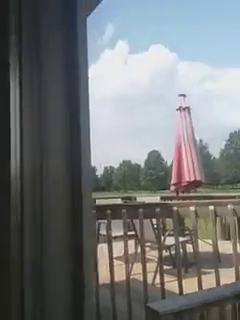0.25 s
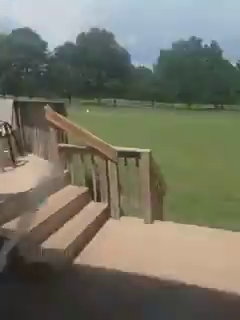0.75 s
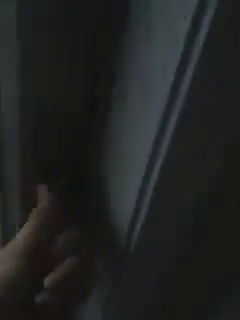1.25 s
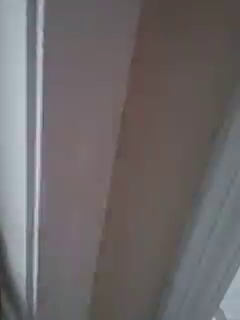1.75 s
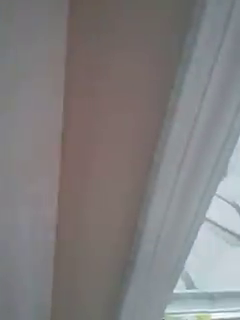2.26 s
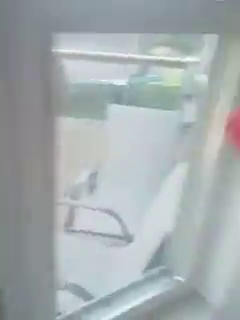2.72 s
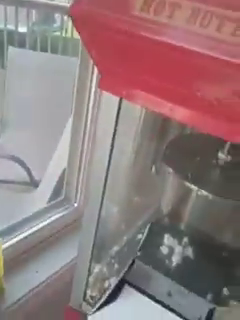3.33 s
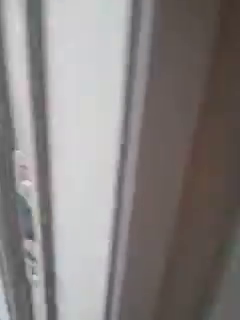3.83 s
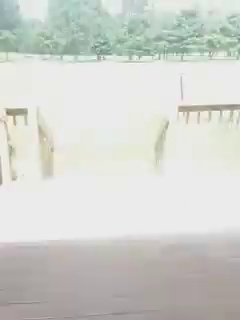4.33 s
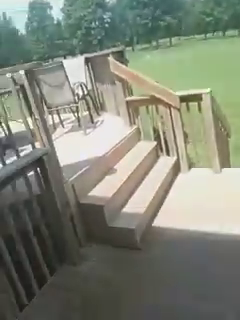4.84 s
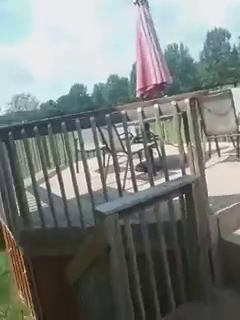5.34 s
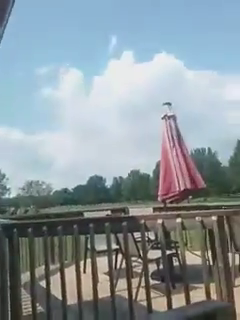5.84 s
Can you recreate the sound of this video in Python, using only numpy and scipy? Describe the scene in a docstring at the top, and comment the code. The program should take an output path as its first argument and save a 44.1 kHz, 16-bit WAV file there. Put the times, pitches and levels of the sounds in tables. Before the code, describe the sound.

Close by in a quiet humming house, small handle clicks and finger rubs lead to a sharp double knock on a sliding glass door. The pane booms and the frame chatters. After a pause the seal pops free and the door rolls roughly along a gritty track, ending in a brief squeak and dry scrape. Low, soft footstep thumps follow, felt through the handheld microphone.

```python
"""House hum and a thin whine, then a handle clicks: a sliding glass patio door, close by inside a house.
Clicks are coloured noise bursts; the door knocks, its pane rings in decaying modes and its frame chatters.
It rolls on a gritty track (dense random grains), then stops with a stick-slip squeak and a dry scrape.
Low thumps, short pitched pushes, are hand bumps and steps felt through the hand holding the microphone.
Soft rubs, far trees and a faint late tone from the yard are shaped noise and a sine."""
import sys
import numpy as np
from scipy import signal
from scipy.fft import rfft, irfft, next_fast_len
from scipy.io import wavfile
from scipy.ndimage import uniform_filter1d

SR = 44100
rng = np.random.default_rng(int(sys.argv[2]) if len(sys.argv) > 2 else 0)


def dump(signal):
    """Clip the signal to [-1, 1] and save it as 16-bit WAV at the path in sys.argv[1]."""
    limited = np.clip(np.atleast_2d(signal).T, -1, 1)
    pcm = np.round(limited * 32767).astype(np.int16)
    wavfile.write(sys.argv[1], SR, pcm)


N = 267907
TIME = np.arange(N) / SR

# House hum and air colour: (frequency [Hz], relative level [dB])
HOUSE_COLOUR = [(15, -51), (25, -20), (37, -13.5), (120, -1), (316, -5), (352, -24.5), (382, -3),
                (449, -19), (513, -14.5), (881, -19.5), (1060, -18), (2390, -21), (5520, -34), (14600, -32),
                (15800, -26)]
# Far-tree colour: (frequency [Hz], relative level [dB])
TREE_COLOUR = [(1000, -17), (2800, -12), (4600, 0), (6000, -8), (8000, -14.5), (15000, -33)]
# Gusts in the far trees: (crest time [s], level [dB], half length [s])
GUSTS = [(1.03, -70, .28), (4.75, -67.5, 0.27), (5.497, -69, 0.89)]
# Handle, latch and grit clicks: (time [s], nominal peak [dB], ring pitch [Hz],
#   top treble before offset and slope [dB], ring strength [dB], left minus right [dB])
CLICKS = [(0.504, -48.5, 2630, -25, 10, -20), (0.56, -34, 2210, -38, 3, -26),
          (1.147, -44.5, 4630, -29, 9, 5), (1.307, -44.5, 2020, -35, -7, 7), (1.34, -47, 2840, -32, 1, -9),
          (1.503, -33.5, 1750, -50, 3, 1), (1.508, -30.5, 4600, -52, 6.5, 25),
          (1.518, -35.5, 1700, -38, 4, -8), (1.559, -41.5, 1880, -49, 4, -1),
          (1.602, -41, 3190, -23, 8, -4), (1.608, -28, 2200, -21, -1.5, 0),
          (1.659, -38.5, 4760, -26, 9.5, 4.5), (1.688, -35.5, 2770, -48, 3, 3),
          (1.73, -33, 2560, -23, 2, 1.5), (1.775, -33, 2520, -21, 6, -7.5), (1.788, -37, 2400, -47, 2, 9),
          (1.915, -33.5, 2900, -29, 6, 0.5), (1.951, -9, 2820, -26, 5, 3.5), (1.968, -26, 1850, -42, 22, 9),
          (1.994, -19, 2090, -46, 4, -1), (2.093, -16.5, 1940, -61, 10, -3), (2.115, -32, 1930, -17, 8, 0),
          (2.132, -32.5, 1900, -35, 13, 3), (2.2, -30.5, 1960, -37, 9.5, 3), (2.371, -46, 2900, -18, -1, 3),
          (3.069, -30, 1710, -17, 3.5, 6), (3.36, -40, 1500, -26, 11, -3), (3.486, -21.5, 2250, -21, 14, 6),
          (3.5, -22.5, 1300, -23, 11, 2), (3.512, -28, 1340, -16, 16, -1),
          (3.568, -24.5, 5060, -25, 24, -1), (3.578, -25.5, 2100, -15, 2, 6),
          (4.135, -30, 1200, -41, -2, 4), (4.232, -30, 2130, -6.5, 5, -5),
          (4.942, -35.5, 2880, -19, 3, -10)]
# Click colour: (frequency [Hz], relative level [dB])
CLICK_COLOUR = [(100, -2.5), (500, -2), (1150, 1), (1700, 5), (2900, 5.5), (3700, 1.5), (5300, -4),
                (6300, -9.5), (7800, -9.5), (15500, -19)]
# Room decay: (frequency [Hz], t60 [s])
ROOM_T60 = [(100, .6), (1000, 0.86), (4000, 0.057), (12000, .2)]
# Rubs of fingers, sleeve and seal: (crest time [s], level [dB], half length [s], left minus right [dB])
BRUSHES = [(0.571, -56, 0.01, -21), (0.796, -64.5, 0.22, -3.5), (1.227, -59, 0.017, 2),
           (1.364, -66, 0.046, 1), (1.544, -56.5, 0.027, 3), (1.712, -65, 0.31, 4),
           (3.117, -58.5, 0.069, -1), (3.458, -50.5, 0.013, -2), (4.886, -56, 0.018, -6),
           (4.989, -54, 0.031, -8), (5.487, -62.5, 0.026, -2)]
# Rub colour: (frequency [Hz], relative level [dB])
RUB_COLOUR = [(300, -19.0), (1000, -3.5), (2000, -2), (4200, -4.5), (6500, -16.0), (15000, -28.5)]
# Creak colour: (frequency [Hz], relative level [dB])
CREAK_COLOUR = [(60, -4), (200, 6), (450, -9.0), (800, -6.5), (1200, -14.0), (2500, -31), (8000, -41)]
# Blows on the door panel: (time [s], gain on the summed modes [dB])
BLOWS = [(1.925, -56), (1.958, -21.5), (2.002, -24), (2.155, -42), (3.08, -55), (3.17, -63), (3.497, -42),
         (3.905, -39), (4.552, -52)]
# Pane and frame modes: (frequency [Hz], relative level [dB], t60 [s])
PANE_MODES = [(52, -11, .6), (80, -10, .6), (115, -14, .7), (173, -4, .6), (188, -9, .45), (235, -14, .55),
              (257, -11, .45), (297, -.5, .38), (315, -1.5, .38), (362, -11, .42), (402, -14, .42),
              (468, -16, .45), (618, -25, .5), (900, -21, .4)]
# Chatter buzz colour: (frequency [Hz], relative level [dB])
BUZZ_COLOUR = [(290, -37), (500, -13), (750, -4), (1100, 0.5), (1500, -6), (2100, -2.5), (3000, -7.5),
               (3600, -10), (4700, -6), (6000, -14.5), (7200, -24), (15500, -39.5)]
# Panel rumble colour: (frequency [Hz], relative level [dB])
RUMBLE_COLOUR = [(20, -13), (45, -14), (80, -2), (170, 1), (330, -1.5), (420, 0.5), (520, -7.5),
                 (650, -11.5), (1200, -51)]
# Roller grit colour: (frequency [Hz], relative level [dB])
ROLLER_COLOUR = [(260, -29.5), (450, -13.5), (510, -2), (555, -27), (600, -6), (680, -7.5), (800, -1.5),
                 (1120, -5.5), (1480, -10), (2000, -9), (2600, -11), (3340, -21), (4430, -30), (6000, -44),
                 (8000, -65)]
# Brush seal colour: (frequency [Hz], relative level [dB])
SEAL_COLOUR = [(1500, -18), (3200, -6), (4700, -3), (5800, -9.5), (7500, -17.5), (10000, -24),
               (15500, -25.5)]
# Hollow frame decay under the rollers, then under the squeak: (frequency [Hz], t60 [s])
ROLLING_FRAME_T60 = [(500, 0.22), (5000, 0.073)]
SQUEAK_FRAME_T60 = [(500, 0.071), (5000, 0.025)]
# Door speed: (time [s], share of top speed [0-1])
DOOR_SPEED = [(3.47, 0), (3.52, 0.58), (3.7, 0.75), (3.85, 1), (4.13, 0.96), (4.33, .48), (4.49, 0.15),
              (4.54, 0.17)]
# Lumps and smooth spots in the track: (time [s], extra panel shake [dB], extra roller pressure [dB])
LUMPS = [(3.72, -7.5, -1), (3.83, 3.5, 4), (3.875, -5.5, 0.5), (3.915, 5.5, 1.5), (3.98, 0, 1),
         (4.04, -3, 0.5), (4.075, 3, 2.5), (4.145, 1, 5), (4.25, 4.5, 0)]
# Hand bumps on the microphone: (crest time [s], level [dB], pitch [Hz], half length [s], left minus right [dB])
BUMPS = [(3.548, -35.5, 68.5, 0.021, 4), (4.288, -29, 82, 0.042, 31), (4.431, -29.5, 102.4, 0.0107, 28)]
# Footsteps: (heel time [s], heel level [dB], heel pitch [Hz], toe delay [s], toe level [dB])
STEPS = [(4.862, -27, 120, 0.075, -39.5), (5.379, -31.5, 81, 0.099, -36), (5.874, -29, 74, .113, -49)]
# Floorboard knocks under the foot: (time [s], level [dB])
BOARDS = [(5.469, -34), (5.893, -32.5)]
# Scuff and floor colours: (frequency [Hz], relative level [dB])
SCUFF_COLOUR = [(25, -6), (70, 17), (180, 7), (400, -8.5), (800, -26), (2000, -44)]
FLOOR_COLOUR = [(40, -5), (80, 2), (160, 3), (320, -11), (500, -20.5), (1000, -43)]
# Roller groans as the door slows: (crest time [s], level [dB], half length [s], pitch [Hz])
GROANS = [(4.148, -41, 0.041, 504), (4.384, -47.5, 0.068, 515)]
# Groan partials: (multiple of pitch, relative level [dB])
GROAN_PARTIALS = [(1, 6), (2, -19)]
# Stick-slip squeak as the door stops: (time [s], pitch [Hz])
SQUEAK_PITCH = [(4.493, 899.5), (4.506, 880.4), (4.515, 817), (4.526, 863), (4.548, 830)]
# Squeak partials: (multiple of pitch, relative level [dB])
SQUEAK_PARTIALS = [(1, -1), (2, -4), (3, 4.5), (4, -16), (5, -13), (6, -12), (7, -22), (8, -22), (9, -28)]
# Dry jerks to a halt: (time [s], level [dB], rise [s], hold [s], t60 [s])
SCRAPES = [(4.494, -28.5, 0.0036, 0.013, 0.27), (4.554, -30, 0.0079, 0.0089, .11),
           (4.596, -43.5, 0.013, 0.021, 0.33)]
# Scrape colour: (frequency [Hz], relative level [dB])
SCRAPE_COLOUR = [(120, -55), (300, -17), (520, -1.5), (640, -7.5), (850, 5), (1150, 3.5), (1400, 2),
                 (1850, 3), (2700, 1), (3400, -2), (4100, -0.5), (5300, -8.5), (6500, -18), (15500, -33)]
# Likeness of the two ports: (frequency [Hz], left-right correlation [-1 to 1])
PORT_LIKENESS = [(40, 0.82), (150, 0.93), (330, 0.89), (550, 0.36), (900, -0.027), (2000, -0.052),
                 (8000, -0.044)]
# Port colour difference: (frequency [Hz], left minus right [dB])
PORT_TILT = [(100, -0.5), (400, -.7), (900, -2), (2200, -4), (4500, -0.6), (12000, 1)]

WHINE_HZ, EDGE_HZ = 15000, 15900
KNOCK_S, REST_S = 1.951, 2.362  # chatter starts; door rests
FREE_S, STOP_S = 3.478, 4.494  # door pulls free of its seal; squeak begins
LUMP_S = 0.015  # half the time a roller takes to cross a lump
# The microphone leans out of the doorway, away from the house hum; later a tone comes from the yard
OUTSIDE_S, YARD_TONE_S = 4.88, 5.79
HEEL_S, TOE_S, TOE_HZ = 0.012, 0.028, 89.7  # half lengths; toe pitch
BOARD_HZ, BOARD_S = 139, 0.0065  # pitch; half length


def amp(db):
    """Decibels to gain."""
    return 10 ** (np.asarray(db) / 20)


def unit(x):
    """Scales to an rms of 1."""
    return x / np.sqrt(np.mean(x ** 2) + 1e-20)


def read(points, hz):
    """Interpolates a spectrum table on a log-frequency axis."""
    f, value = np.transpose(points)
    return np.interp(np.log(hz + 1), np.log(f + 1), value)


def pan(db):
    """Left and right gains for a level difference, at constant total power."""
    return amp([[db / 2], [-db / 2]]) / np.sqrt(np.cosh(db * np.log(10) / 20))


def add(mix, s, sound):
    """Mixes a stereo sound in at time s."""
    part = mix[:, round(s * SR):][:, :sound.shape[1]]
    part += sound[:, :part.shape[1]]


def lowpass_or_highpass(x, kind, hz):
    """Third-order Butterworth filter."""
    return signal.sosfilt(signal.butter(3, hz, kind, fs=SR, output="sos"), x)


def colour(x, points, extra_db=lambda hz: 0, size=4096):
    """Causal minimum-phase filter with the given spectrum."""
    hz = abs(np.fft.fftfreq(size, 1 / SR))
    log_gain = np.log(amp(np.maximum(read(points, hz) + extra_db(hz), -100)))
    taps = np.fft.ifft(np.exp(signal.hilbert(log_gain).conj())).real
    return signal.fftconvolve(x, taps[None, :size // 2], axes=1)[:, :x.shape[1]]


def diffuse(x):
    """Long waves reach both microphone ports nearly alike, short ones do not."""
    size = next_fast_len(N)
    left, other = rfft(x, size)
    same = np.clip(read(PORT_LIKENESS, np.fft.rfftfreq(size, 1 / SR)), -1, 1)
    right = same * left + np.sqrt(1 - same ** 2) * other
    return unit(irfft(np.array([left, right]), size)[:, :N])


def wander(rate):
    """Random line of rms 1 through `rate` new points a second."""
    return unit(np.interp(TIME * rate, np.arange(N), rng.standard_normal(N)))


def noise(points):
    """Smooth stereo noise of a given colour."""
    return diffuse(colour(rng.standard_normal((2, N)), points))


def grains(points, per_s, spread_db):
    """Many tiny contacts of uneven size; crackle power decays with a 1 ms time constant."""
    size = amp(spread_db * np.minimum(rng.exponential(1, N), 4))
    size = size * (rng.random(N) < per_s / SR)
    power = signal.lfilter([1], [1, -np.exp(-1000 / SR)], size ** 2)
    return diffuse(colour(np.sqrt(power) * rng.standard_normal((2, N)), points))


def ring(x, t60s):
    """Dense random echoes, each band dying at its own speed."""
    hz, t, z = signal.stft(rng.standard_normal((2, SR // 2)), SR, nperseg=256)
    decay = np.exp(-np.log(1000) * t / read(t60s, hz)[:, None])
    tail = signal.istft(z * decay, SR, nperseg=256)[1]
    wet = signal.fftconvolve(x, tail / np.linalg.norm(tail[0]), axes=1)[:, :N]
    return diffuse(wet) * np.std(x)


def envelope(start, rise_s, hold_s, t60):
    """Straight rise, hold, then exponential decay."""
    t = TIME - start
    return np.clip(t / rise_s, 0, 1) * amp(-60 * np.maximum(t - rise_s - hold_s, 0) / t60)


def swell(crest, half_s):
    """Gaussian rise and fall; half_s is its 1/e half length."""
    return np.exp(-((TIME - crest) / half_s) ** 2)


def stick_slip(hz, partials, jitter, rough):
    """A rubbed contact grips and lets go at an unsteady rate."""
    turns = np.cumsum(hz * (1 + jitter * wander(rate=760))) / SR
    tone = sum(amp(level) * np.cos(2 * np.pi * (k * turns + rng.random((2, 1)))) for k, level in partials)
    return unit(tone * (1 + rough * wander(rate=910)))


def patchy(x, depth_db, width_hz=260, span_s=.035):
    """The colour shifts by chance in small time-frequency patches."""
    z = signal.stft(x, nperseg=512)[2]
    field = rng.standard_normal(z.shape[1:])
    field = uniform_filter1d(field, max(2, round(width_hz * 512 / SR)), axis=0)
    field = uniform_filter1d(field, max(2, round(span_s * SR / 256)), axis=1)
    return unit(signal.istft(z * amp(depth_db * unit(field)), nperseg=512)[1][:, :N])


def background(hum_db=-63, outside_db=-7, lean_s=0.11, air_db=-63.0, trees_db=-81, split_hz=480,
               whine_db=-80, yard_db=-71, yard_hz=700):
    """House hum, open air, far trees, a faint tone from the yard and a thin electronic whine."""
    lean = (1 + np.tanh((TIME - OUTSIDE_S) / lean_s)) / 2
    wash = noise(HOUSE_COLOUR)
    hum = amp(hum_db + outside_db * lean) * unit(lowpass_or_highpass(wash, "low", split_hz))
    air = amp(air_db) * unit(lowpass_or_highpass(wash, "high", split_hz))
    wind = amp(trees_db) + sum(amp(db) * swell(s, half_s) for s, db, half_s in GUSTS)
    yard_level = amp(yard_db) * envelope(YARD_TONE_S, rise_s=0.052, hold_s=0.24, t60=1)
    yard = yard_level * np.sin(2 * np.pi * yard_hz * TIME)
    whine = amp(whine_db) * np.sin(2 * np.pi * WHINE_HZ * TIME)
    return hum + air + wind * noise(TREE_COLOUR) + yard + whine


def clicks(crest_db=20, ring_octaves=0.32, ring_t60=0.014, snap=1.6, rise_s=0.00082,
           after_db=-23, after_t60=0.19, treble_db=14):
    """Hard contacts: a first touch, a snap, a short metal ring and a weaker shiver of the frame."""
    out, t = np.zeros((2, N)), np.arange(4096) / SR
    fade = amp(-60 * t / ring_t60) + amp(after_db - 60 * t / after_t60)
    fade = fade * (1 - np.exp(-(t / rise_s) ** 2))
    for s, db, pitch, top_db, ring_db, side_db in CLICKS:
        burst = 0.49 * fade * rng.standard_normal((2, len(t)))
        burst[[0, 1], [52, 58]] += snap  # sample indices: left port first

        def tint(hz):
            """A broad resonance at the pitch plus a treble slope set per contact."""
            resonance = ring_db * np.exp(-(np.log2((hz + 1) / pitch) / ring_octaves) ** 2)
            return resonance + (top_db + treble_db) * np.clip((hz - 6000) / 3000, 0, .7)

        click = unit(colour(burst, CLICK_COLOUR, tint))
        add(out, s, amp(db - crest_db) * pan(side_db) * click)
    return out


def brushes():
    """Short soft rubs of skin, cloth and seal: grains under smooth swells."""
    rub = grains(RUB_COLOUR, per_s=3500, spread_db=2.5)
    return rub * sum(amp(db) * pan(side_db) * swell(s, half_s) for s, db, half_s, side_db in BRUSHES)


def creak(start_s=1.776, level_db=-43.0, tone_db=-10, start_hz=640, glide_hz_per_s=9000, top_hz=1100):
    """The handle reaches its stop: quick slips in the hollow frame, rising in pitch."""
    slips = grains(CREAK_COLOUR, per_s=3500, spread_db=-0.5)
    hz = np.clip(start_hz + glide_hz_per_s * (TIME - start_s), start_hz, top_hz)
    tone = amp(tone_db) * stick_slip(hz, [(1, 0)], jitter=0.064, rough=.4)
    return amp(level_db) * envelope(start_s, rise_s=0.0017, hold_s=0.016, t60=0.19) * (slips + tone)


def boom(rise_s=0.0036):
    """One second of the glass and its frame ringing; close modes beat."""
    t = np.arange(SR) / SR
    modes = sum(amp(db - 60 * t / t60) * np.sin(2 * np.pi * hz * t) for hz, db, t60 in PANE_MODES)
    return modes * (1 - np.exp(-t / rise_s))


def pane():
    """Each blow sets the pane booming in its modes."""
    out, ringing = np.zeros((2, N)), pan(0) * boom()
    for s, db in BLOWS:
        add(out, s, amp(db) * ringing)
    return out


def shudder(rumble_db=-32, buzz_db=-27, late_rumble_db=-47, late_buzz_db=-52.5, dull_hz=360,
            rattle_db_per_s=-8.0):
    """The loose door chatters on its track: a fast-dying burst over a weak rattle that fades once it rests."""
    rattle = envelope(KNOCK_S, rise_s=0.011, hold_s=REST_S - KNOCK_S, t60=0.13)
    rattle = rattle * amp(rattle_db_per_s * np.maximum(TIME - KNOCK_S, 0))
    rumble = amp(rumble_db) * envelope(KNOCK_S, rise_s=0.022, hold_s=0.022, t60=0.52)
    rumble = rumble + amp(late_rumble_db) * rattle
    buzz = amp(buzz_db) * envelope(KNOCK_S, rise_s=0.0023, hold_s=0.0057, t60=0.44)
    buzz = buzz + amp(late_buzz_db) * rattle
    dull = unit(lowpass_or_highpass(noise(RUMBLE_COLOUR), "low", dull_hz))
    return rumble * dull + buzz * patchy(grains(BUZZ_COLOUR, per_s=1900, spread_db=-0.5), depth_db=1.5)


def breakaway(strain_db, pop_db, build_db_per_s, rise_s, t60):
    """The seal strains ever louder under the pull, then lets go in a burst."""
    build = amp(np.minimum(TIME - FREE_S, 0) * build_db_per_s)
    strain = build * envelope(FREE_S - .4, rise_s=0.095, hold_s=0.303, t60=.3)
    return amp(strain_db) * strain + amp(pop_db) * envelope(FREE_S, rise_s, hold_s=0.044, t60=t60)


def rolling(rumble_db=-39.5, roller_db=-39, seal_db=-54, rumble_power=0.52, roller_power=1.15,
            seal_power=0.28, rasp_db=0.34):
    """Rollers crush grit and shake the panel; hollow frame rings, brush seal hisses; all grow with speed."""
    speed = np.maximum(np.interp(TIME, *np.transpose(DOOR_SPEED), left=0, right=0), 0)
    shaking_db = sum(db * swell(s, LUMP_S) for s, db, _ in LUMPS)
    pressure_db = sum(db * swell(s, LUMP_S) for s, _, db in LUMPS)

    shake = amp(rumble_db + shaking_db) * speed ** rumble_power
    shake = shake + breakaway(strain_db=-67, pop_db=-45, build_db_per_s=90, rise_s=0.028, t60=0.18)
    rollers = amp(roller_db + pressure_db) * speed ** roller_power
    rollers = rollers + breakaway(strain_db=-46, pop_db=-41.5, build_db_per_s=81, rise_s=0.0065, t60=0.14)
    seal = amp(seal_db) * speed ** seal_power
    seal = seal + breakaway(strain_db=-51, pop_db=-47, build_db_per_s=78.5, rise_s=0.0054, t60=0.42)

    rasp = amp(rasp_db * wander(rate=120))
    grit = grains(ROLLER_COLOUR, per_s=1100, spread_db=2.5)
    framed = unit(0.99 * grit + ring(grit, ROLLING_FRAME_T60))
    rumble = unit(rasp * grains(RUMBLE_COLOUR, per_s=900, spread_db=1.5))
    hiss = grains(SEAL_COLOUR, per_s=4300, spread_db=3.0)
    return shake * rumble + rollers * patchy(rasp * framed, depth_db=2.0) + seal * hiss


def thumps(scuff_db=-12, sole_db=-18, heel_side_db=-22, toe_side_db=-11):
    """Jolts push the microphone for a cycle or two, with a dull scuff; a step rolls from heel to toe."""
    scuff = unit(colour(rng.standard_normal((2, N)), SCUFF_COLOUR))

    def jolt(s, db, hz, half_s, side_db):
        """One low push and its scuff."""
        push = swell(s, half_s)
        wave = push * np.cos(2 * np.pi * hz * (TIME - s))
        return amp(db) * pan(side_db) * (wave + amp(scuff_db) * np.sqrt(push) * scuff)

    out = sum(jolt(*row) for row in BUMPS)
    out = out + sum(jolt(s, db, BOARD_HZ, BOARD_S, heel_side_db) for s, db in BOARDS)
    floor = noise(FLOOR_COLOUR)
    for s, heel_db, hz, delay_s, toe_db in STEPS:
        heel = jolt(s, heel_db, hz, HEEL_S, heel_side_db)
        sole_level = amp(heel_db + sole_db) * pan(toe_side_db)
        sole = sole_level * envelope(s, rise_s=.014, hold_s=0.0073, t60=0.4) * floor
        toe = jolt(s + delay_s, toe_db, TOE_HZ, TOE_S, toe_side_db)
        out = out + heel + sole + toe
    return out


def stop(squeak_db=-25.5, frame_db=-6):
    """A roller groans; the seal gives a short hoarse squeak that rings in the frame, then drags dry."""
    groan = sum(amp(db) * swell(s, half_s) * stick_slip(hz, GROAN_PARTIALS, jitter=0.1, rough=0.41)
                for s, db, half_s, hz in GROANS)
    squeak_hz = np.interp(TIME, *np.transpose(SQUEAK_PITCH))
    squeak = stick_slip(squeak_hz, SQUEAK_PARTIALS, jitter=0.017, rough=0.23)
    squeak = amp(squeak_db) * envelope(STOP_S, rise_s=.012, hold_s=0.013, t60=0.14) * squeak
    framed = squeak + amp(frame_db) * ring(squeak, SQUEAK_FRAME_T60)
    drag = sum(amp(db) * envelope(s, rise_s, hold_s, t60) for s, db, rise_s, hold_s, t60 in SCRAPES)
    scrape = drag * patchy(grains(SCRAPE_COLOUR, per_s=3400, spread_db=0.0), depth_db=3.0)
    return groan + framed + scrape


def scene(room_db=-13):
    """The door close by, the room answering its clicks."""
    hits = clicks()
    room = amp(room_db) * ring(hits, ROOM_T60)
    door = hits + room + creak() + pane() + shudder() + rolling() + stop()
    return background() + door + brushes() + thumps()


def record(dry, low_cut_hz=38):
    """The microphone sheds deep bass and its two ports differ in colour; then the band limit."""
    dry = lowpass_or_highpass(dry, "high", low_cut_hz)
    size = next_fast_len(N + 2048)
    tilt_db = read(PORT_TILT, np.fft.rfftfreq(size, 1 / SR))
    heard = irfft(rfft(dry, size) * amp([tilt_db / 2, -tilt_db / 2]), size)[:, :N]
    band_limit = signal.firwin(511, EDGE_HZ, window=("kaiser", 9), fs=SR)
    return signal.oaconvolve(heard, band_limit[None], "same")


dry = scene()
out = record(dry)
dump(out)
```